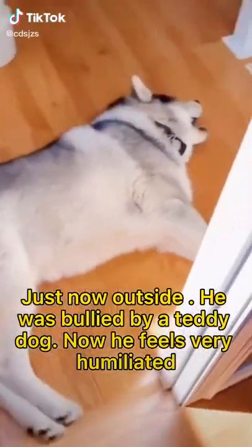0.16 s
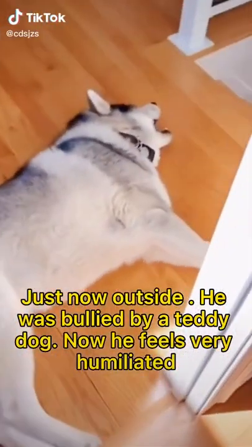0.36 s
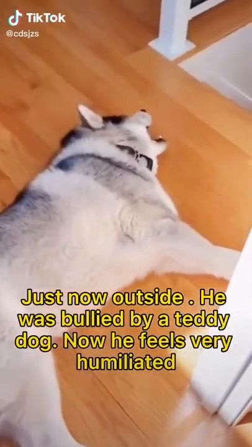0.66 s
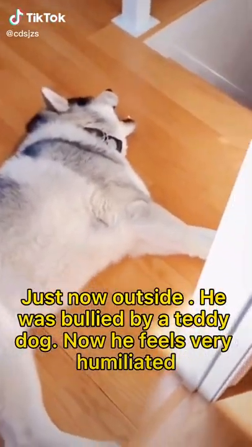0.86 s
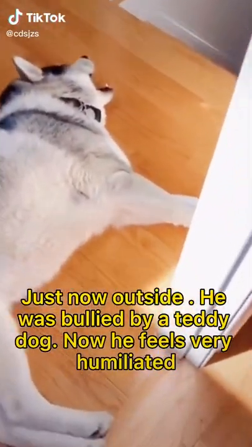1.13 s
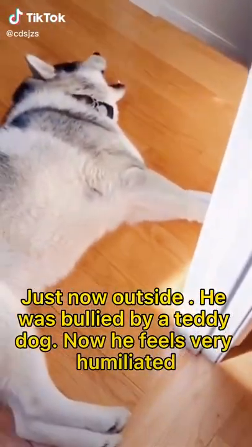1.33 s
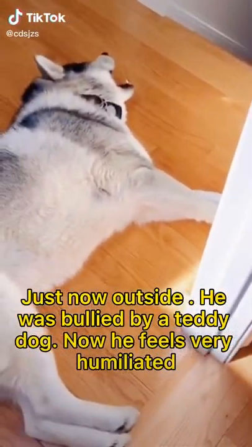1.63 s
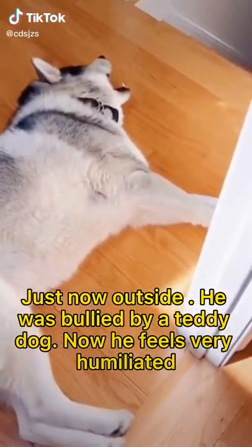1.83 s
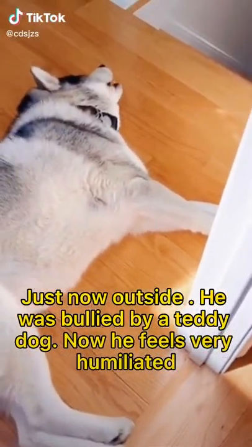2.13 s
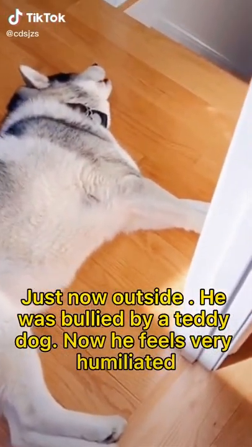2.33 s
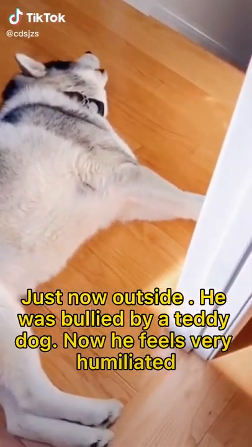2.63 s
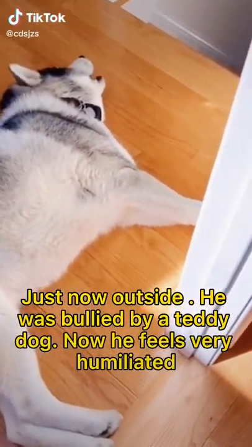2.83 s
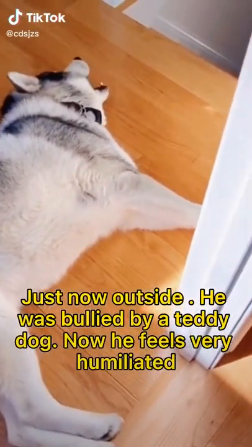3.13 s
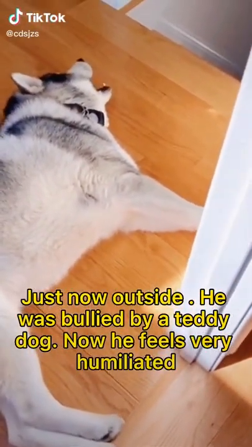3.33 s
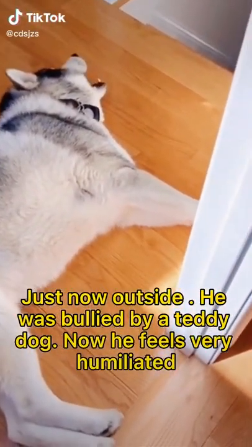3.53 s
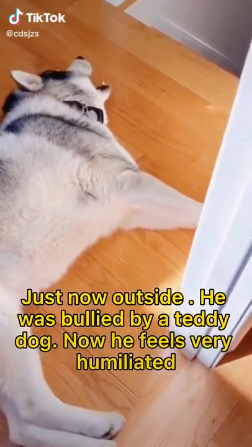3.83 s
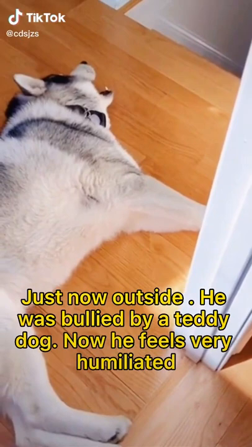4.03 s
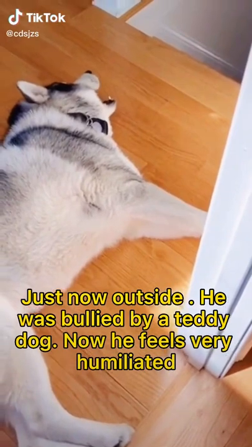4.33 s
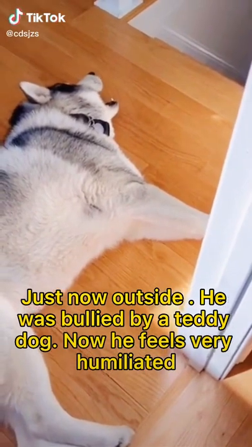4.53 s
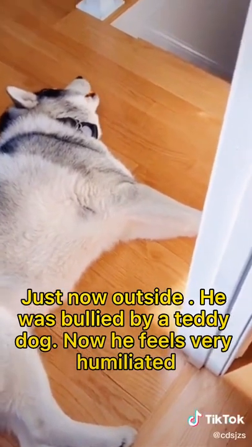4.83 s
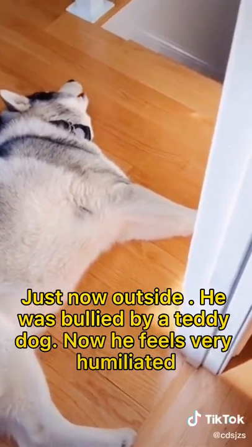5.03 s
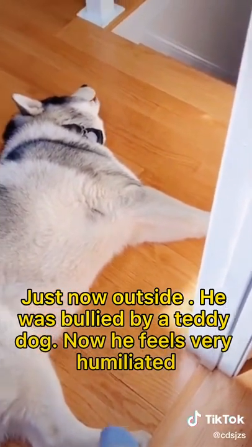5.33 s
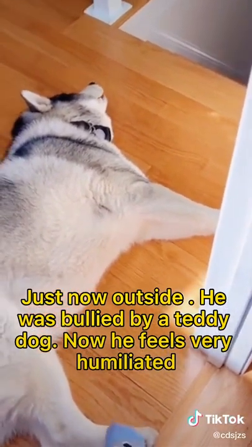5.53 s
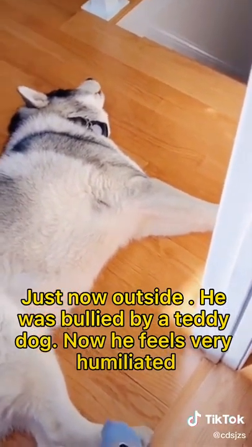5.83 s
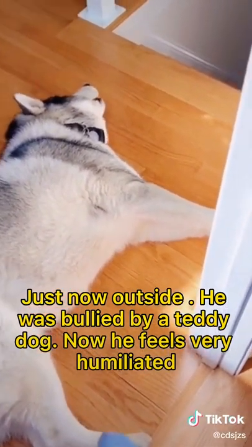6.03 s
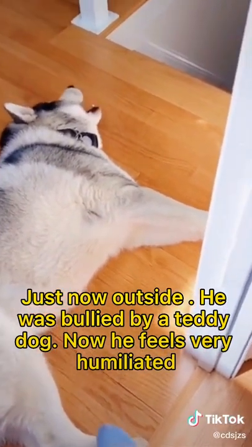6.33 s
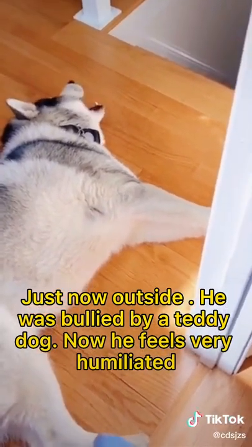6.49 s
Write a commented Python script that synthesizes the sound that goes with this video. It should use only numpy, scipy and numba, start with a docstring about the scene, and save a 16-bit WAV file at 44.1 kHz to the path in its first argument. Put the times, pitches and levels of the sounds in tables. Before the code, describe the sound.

Three loud dog howls in a hard, reflective room, captured close by a phone that squeezes the loud notes. The first is pure and held around one pitch; the second starts low, wobbles and goes raspy and screamy, held for over a second; the third, after nearly a second of quiet, begins as a soft groan and leaps upward with voice cracks. Faint low rustles and soft hiss lie beneath.

```python
"""In a bare, ringing room with a wooden floor, a husky howls three times, close to a phone.
The first howl is one clean note; the second wavers and breaks into a hoarse scream.
The third climbs from a low groan and cracks twice.
One pulsing larynx drives the resonances of throat and mouth, with a thin whistle and hiss on top.
Still air, soft rustles and faint hiss lie underneath; the phone's limiter holds loud notes down."""
import sys
import numpy as np
from scipy import signal
from scipy.fft import rfft, irfft, next_fast_len
from scipy.io import wavfile
from scipy.ndimage import uniform_filter1d, minimum_filter1d
from numba import njit

SR = 44100
rng = np.random.default_rng(int(sys.argv[2]) if len(sys.argv) > 2 else 0)


def store_pcm(level_fs):
    """Save levels as 16-bit WAV."""
    pcm = np.round(np.clip(level_fs, -1, 1) * 32767).astype(np.int16)
    wavfile.write(sys.argv[1], SR, np.atleast_2d(pcm).T)


N = 293706
TIME = np.arange(N) / SR

# tone colour of the still room: f/Hz, relative level/dB
AIR_SPECTRUM = [(15, -36), (25, -1), (59, -9), (159, -13), (183, -22.5), (219, -10.5), (285, -29),
                (777, -41.5), (1390, -48.5), (2490, -45.5), (3050, -53), (3960, -70.5), (6710, -120)]
AIR_DB = -60.5  # overall level of the still room, before the phone
# soft low rustles: t/s, half-length/s, level/dB, upper edge f/Hz
RUSTLES = [(0.425, 0.48, -50, 47.8), (2.156, 0.065, -39.5, 248)]

# how long the room's tail takes to fall by 60 dB: f/Hz, decay time/s
ROOM_T60 = [(250, 0.33), (800, 0.72), (2300, 0.5), (4500, 0.29), (9000, 0.32), (14000, 0.089)]
# tone colour of the dense tail, weaker where standing waves carry the sound: f/Hz, gain/dB
DIFFUSE_SPECTRUM = [(200, -3), (420, -1.5), (560, 1), (730, -5), (900, 1.5), (1300, -8), (1700, 0),
                    (3000, -5.5), (9000, -2)]
# the room's strongest standing waves: f/Hz, relative gain/dB, decay time for 60 dB/s
ROOM_MODES = [(460, -5, 0.61), (527, -5, 0.77), (544, -4, 0.41), (599, 8, 1), (638, 1.5, 0.12),
              (695, -4, 0.15), (716.6, -8, 0.49), (720, 1, 0.04), (789, -2, 0.29), (740, -8.5, 0.7),
              (767, 1, 0.39), (845, 6, 0.17), (840, -11, 0.2), (1024, 3.5, 0.25), (1104.2, 9, 0.19),
              (1084, -2, .6), (1075, 1.5, .6), (1256, -2, 0.85), (1250, -0.5, .6), (1238, 6, 1)]
# the fundamental surges or sags as direct and reflected sound add or cancel:
# t/s, half-length/s, gain/dB
SURGES = [(0.067, 0.0055, -10.5), (0.171, 0.0046, -9), (0.427, 0.012, -8), (0.773, 0.026, -12),
          (0.949, 0.027, -12), (1.235, 0.029, -15.5), (2.636, 0.0073, -12.5), (2.657, 0.01, 4.5),
          (2.72, 0.0093, -9.5), (2.76, 0.0061, 10.5)]

# pitch of the larynx, one curve per howl: t/s, f/Hz
PITCH = [
    [(0, 675.6), (.07, 708.8), (.22, 725.1), (.47, 739.7), (.8, 743.8), (1.15, 746.5), (1.42, 725.5),
     (1.7, 729.6), (1.88, 712.4), (1.96, 564)],
    [(2.26, 360), (2.3, 507.5), (2.4, 590.4), (2.49, 520.6), (2.61, 501.4), (2.75, 573.3), (2.85, 681.3),
     (2.92, 612.6), (2.965, 628.7), (3.12, 806.7), (3.27, 748), (3.5, 731), (3.6, 651.8), (3.73, 593.8),
     (3.77, 794.8), (4.0, 791), (4.28, 753.3), (4.47, 781.7), (4.64, 766.8)],
    [(5.56, 382.2), (5.68, 536.8), (5.82, 581.7), (6.05, 768), (6.065, 580.3), (6.23, 740), (6.37, 792.5),
     (6.395, 664), (6.52, 697.8), (6.66, 707)],
]
# effort of the dog, one curve per howl: t/s, relative level/dB, mouth opening/0-1
EFFORT = [
    [(0, 0.5, 0.59), (.3, -2.5, .35), (.5, -4, 0.52), (.85, -9, .72), (1.3, -2.5, 0.35), (1.7, 5.5, 0.34),
     (1.94, -17, 0.76)],
    [(2.27, -13.5, .3), (2.36, -7, 0.46), (2.47, -14, 0), (2.75, -12.5, 0.3), (2.86, -10.5, 0.53),
     (3.12, -10.5, 0.51), (3.3, -16.5, 0.9), (3.41, -0.5, 0.44), (3.55, -16.5, 0.73), (4.2, -16.5, .75),
     (4.62, -15.5, 0.55)],
    [(5.58, -29, 0.08), (5.635, -17, .05), (5.71, -30.5, .05), (5.8, -28, .05), (5.95, -15, 0.5),
     (6.12, -8, 0.52), (6.32, -7, .6), (6.42, -13, 0.74), (6.66, -9, 0.7)],
]
# strained stretches, where the vocal folds flap unevenly:
# start t/s, length/s, roughness added to the calm voice/0-1, share of strong-weak pulsing/0-1
STRAINS = [(1.914, 0.045, .35, 0), (2.249, 0.044, .45, 0.4), (2.331, 0.092, .65, 0.4), (2.462, 0.55, 0, 0),
           (2.966, .13, 0.7, 0.8), (3.136, 0.11, 0.3, .5), (3.369, 0.17, 0.2, .2), (3.539, 0.15, .13, .08),
           (3.718, .55, .66, 1), (4.298, .36, 0.5, 1), (5.544, .12, .65, 0.6), (5.795, 0.31, .12, 0.7),
           (6.051, .04, 0.8, .4), (6.102, 0.18, .06, 0), (6.35, 0.028, .7, 0.6), (6.495, 0.12, .11, .28)]
STRAIN_ATTACK_S, STRAIN_RELEASE_S, CALM_ROUGHNESS = .025, .05, 0.032

# what the throat passes before the mouth shapes it: f/Hz, gain/dB
THROAT = [(150, -29), (290, -12), (370, 8), (450, 7), (700, 4), (1250, 0.5), (1740, -4.5), (1950, 3.5),
          (2300, -3), (2520, 3.5), (2720, -8.5), (2950, -10.5), (3250, -13.5), (4500, -46.5)]
# overtones that leak past the mouth's resonances: f/Hz, relative level/dB
OVERTONES = [(2500, -28), (3100, -2), (3700, 7), (4500, -12.5), (5300, -2), (6100, -2.5), (6700, -25),
             (9000, -28.5), (15000, -37.5)]
# the whistle and its side tones: f/Hz, relative level/dB
WHISTLE_SPECTRUM = [(5500, -49), (6500, -23.5), (7000, -4), (7750, 3), (8450, -8.5), (9200, 4.5),
                    (9950, -10), (10700, -0.5), (11400, -2), (12600, -16), (14000, -28.5)]
# rushing air in the open throat: f/Hz, relative level/dB
HISS_SPECTRUM = [(2500, -18), (3300, -1.5), (3900, 1), (4600, -8.5), (5800, 6.5), (6800, 2), (7800, -3),
                 (8600, -5), (9300, -8.5), (10100, -11.5), (11300, -4), (12300, -13), (13500, -27),
                 (16000, -33.5)]

# the jaw tunes the first resonance to the note; strain pulls it down
JAW_REST_HZ, JAW_PER_PITCH, JAW_LAG_S, JAW_STRAIN_HZ = 127, 0.91, 0.15, 88
JAW_WIDTH_HZ = 504
# second, third and fourth resonance of the mouth: f/Hz, width/Hz
UPPER_RESONANCES = [(1137, 603), (2130, 503), (2640, 323)]
# level with the mouth shut, against the effort, and gain as it opens fully
SECOND_SHUT_DB, SECOND_OPEN_DB = -28.5, 22
THIRD_SHUT_DB, THIRD_OPEN_DB = -23, 21
FOURTH_SHUT_DB, FOURTH_OPEN_DB = -25, 14
SECOND_ROUGH_DB = 6.5  # a fully rough voice fills the second resonance
FOURTH_CLEAN_DB, CLEAN_ROUGHNESS = -18.5, 0.098  # a clean voice fades the fourth
# nasal twangs, where the second resonance gains on the first:
# t/s, half-length/s, lift of the second resonance/dB
TWANGS = [(1.94, .03, 7.5), (2.96, .055, 14.5), (3.66, 0.077, 11.5), (6.47, 0.15, 8)]
TWANG_TRADE = 0.92  # dB that the first resonance loses for each dB of lift

# the chest groans an octave below the larynx as the third howl starts, growing with effort
GROAN_START_S, GROAN_END_S, GROAN_ATTACK_S, GROAN_RELEASE_S = 5.555, 6.035, 0.013, 0.053
GROAN_DB, GROAN_GROWTH = -8.5, 0.41  # base level; dB gained for each dB of effort
GROAN_SWELL_S, GROAN_SOFT_DB = 5.88, -22.5  # it stays soft until it swells

TOP_HZ = 15700  # the phone cuts everything above


def undb(db):
    """Turn decibels into gain."""
    return 10 ** (np.asarray(db) / 20)


def unit(x):
    """Scale to an average strength (rms) of 1."""
    return x / np.sqrt(np.mean(x ** 2))


def steady(x):
    """Even out the strength over time, holding the running rms at 1."""
    size = SR // 40
    power = uniform_filter1d(uniform_filter1d(x * x, size), size)
    return x / np.sqrt(np.abs(power) + 1e-12)


def curves(howl_curves):
    """Join each column of the howls' points by straight lines in time."""
    t, *columns = np.vstack(howl_curves).T
    return [np.interp(TIME, t, column) for column in columns]


def swells(rows):
    """Add up bell-shaped swells given as (t/s, half-length/s, height)."""
    return sum(height * np.exp(-.5 * ((TIME - t) / half_s) ** 2) for t, half_s, height in rows)


def along_hz(points, hz):
    """Read values between (f/Hz, value) points, with equal steps per octave."""
    f, value = np.transpose(points)
    return np.interp(np.log(hz + 1e-9), np.log(f), value)


def colour(x, points):
    """Filter a sound so each frequency gets its gain from (f/Hz, gain/dB) points."""
    size = next_fast_len(N + SR // 10)
    gain = undb(along_hz(points, np.fft.rfftfreq(size, 1 / SR)))
    return irfft(rfft(x, size) * gain, size)[:N]


def wander(hz):
    """Random motion of rms 1, mostly slower than hz."""
    lowpass = signal.butter(2, hz, fs=SR, output="sos")
    return unit(signal.sosfilt(lowpass, rng.standard_normal(N)))


@njit
def moving_bandpass(x, hz, width):
    """Pass a band around a centre that may move, using a state-variable filter."""
    y, band, low = np.empty(len(x)), 0., 0.
    for i in range(len(x)):
        g, k = np.tan(np.pi * hz[i] / SR), width / hz[i]
        v = (band + g * (x[i] - low)) / (1 + g * (g + k))
        band = 2 * v - band
        low = low + 2 * g * v
        y[i] = k * v
    return y


@njit
def follow(x, attack, release):
    """Track loudness with an envelope that rises fast and falls slowly."""
    out, e = np.empty(len(x)), 0.
    for i in range(len(x)):
        e += (abs(x[i]) - e) * (attack if abs(x[i]) > e else release)
        out[i] = e
    return out


def still_air():
    """The quiet room: random noise, strongest at the bottom."""
    return undb(AIR_DB) * unit(colour(rng.standard_normal(N), AIR_SPECTRUM))


def microphone_hiss(gain_db=-85):
    """Faint noise of the microphone itself, with more mids than treble."""
    return undb(gain_db) * colour(rng.standard_normal(N), [(3000, 7.5), (12000, -8.5)])


def rustles():
    """Dull swells of noise, one as the phone moves in and one in the pause after the first howl."""
    out = np.zeros(N)
    for t, half_s, db, edge_hz in RUSTLES:
        spectrum = [(edge_hz / 8, -12), (edge_hz / 3, 0), (edge_hz, -2),
                    (edge_hz * 2, -18), (edge_hz * 25, -36), (edge_hz * 60, -55)]
        noise = unit(colour(rng.standard_normal(N), spectrum))
        out += noise * swells([(t, half_s, undb(db))])
    return out


def dense_tail(build_s=0.0033):
    """Countless echoes as fading noise, each frequency band dying at its own rate."""
    f, frames, grains = signal.stft(rng.standard_normal(SR), SR, nperseg=256)
    t60 = along_hz(ROOM_T60, f)[:, None]
    decay = np.exp(-np.log(1000) * frames / t60) / np.sqrt(t60)
    tail = signal.istft(grains * decay, SR)[1][:SR]
    tail = tail * (1 - np.exp(-TIME[:SR] / build_s))  # echoes need a moment to build up
    return tail / np.sqrt(np.sum(tail ** 2))


def standing_waves():
    """Waves trapped between the walls ring on as fading pure tones."""
    t = TIME[:SR]
    ring = np.zeros(SR)
    for hz, db, t60 in ROOM_MODES:
        rate = np.log(1000) / t60
        level = undb(db) * 2 * rate / SR  # long rings start softer
        ring += level * np.exp(-rate * t) * np.cos(2 * np.pi * hz * t)
    return ring


def room(x, wet_db=-0.5, direct_db=-5, modes_db=-5):
    """Bare walls and floor add standing waves and a dense tail to the direct sound."""
    diffuse = colour(signal.fftconvolve(x, dense_tail())[:N], DIFFUSE_SPECTRUM)
    ringing = signal.fftconvolve(x, standing_waves())[:N]
    return undb(direct_db) * x + undb(wet_db) * diffuse + undb(modes_db) * ringing


def surge(x):
    """The lowest partial dips or swells briefly while the overtones carry on."""
    fundamental = colour(x, [(850, 1.0), (1100, -42)])
    return x - fundamental * (1 - undb(swells(SURGES)))


def strain():
    """Roughness and strong-weak pulsing: each strain sets in fast, holds, and relaxes."""
    rough, alternate = np.zeros(N), np.zeros(N)
    for start_s, length_s, roughness, share in STRAINS:
        attack = np.clip((TIME - start_s) / STRAIN_ATTACK_S, 0, 1)
        release = np.exp(-np.maximum(TIME - start_s - length_s, 0) / STRAIN_RELEASE_S)
        shape = attack * release
        rough = np.maximum(rough, roughness * shape)
        alternate = np.maximum(alternate, share * shape)
    return CALM_ROUGHNESS + rough, alternate


def larynx(hz, rough, alternate, jitter=.06, lurch=.05, shimmer=1.0, tremor=0.0012, leak=0.047,
           flutter_db=4, sway=.02):
    """Vocal-fold pulses and phase; strain upsets pitch and size and may weaken every second pulse."""
    bend = (tremor + lurch * rough ** 1.3) * wander(28)
    bend += sway * rough * wander(9)
    bend += jitter * rough ** 1.3 * wander(170)
    phase = 2 * np.pi * np.cumsum(hz * (1 + bend)) / SR
    pulses = sum(np.cos(k * phase) for k in np.arange(1, 13))  # twelve partials
    size = 1 + alternate * np.cos(phase / 2 + 1.2 * rough * wander(40))
    size += shimmer * rough ** 1.4 * wander(790)
    size *= undb(flutter_db * rough * wander(90))  # the strained folds flap unevenly
    breath = leak * rough ** 0.62 * rng.standard_normal(N)
    return unit(pulses * size) + breath, phase


def groan(phase, level_db, swell_s=0.012):
    """The chest sounds at half the pitch: soft at first, then swelling until the voice cracks."""
    attack = np.clip((TIME - GROAN_START_S) / GROAN_ATTACK_S, 0, 1)
    release = np.clip((GROAN_END_S - TIME) / GROAN_RELEASE_S + 1, 0, 1)
    soft = .5 - .5 * np.tanh((TIME - GROAN_SWELL_S) / swell_s)
    groan_db = GROAN_DB + GROAN_GROWTH * level_db + GROAN_SOFT_DB * soft
    return undb(groan_db) * (attack * release) ** 2 * unit(np.sin(phase / 2))


def treble(source, rough, overtone_db=-28, whistle_hz=7015, carrier=0.26,
           whistle_rough_db=-38.55, whistle_clear_db=5.7, hiss_rough_db=-29, hiss_clear_db=-20):
    """Faint overtones, hiss, and a thin whistle that each pulse of the larynx chops into side tones."""
    clear = np.exp(-rough / 0.16)  # near 1 in a clean voice, near 0 in a hoarse one
    moving_hz = whistle_hz * (1 + 0.07 * rough * wander(13))  # a rough voice unsettles its pitch
    whistle = (source + carrier) * np.sin(2 * np.pi * np.cumsum(moving_hz) / SR)
    whistle_db = whistle_rough_db + whistle_clear_db * clear
    hiss_db = hiss_rough_db + hiss_clear_db * clear
    out = undb(overtone_db) * steady(colour(source, OVERTONES))
    out += undb(whistle_db) * steady(colour(whistle, WHISTLE_SPECTRUM))
    return out + undb(hiss_db) * unit(colour(rng.standard_normal(N), HISS_SPECTRUM))


def resonance(x, hz, width_hz):
    """An air space in the mouth favours one band: the band-pass applied twice for steep sides."""
    hz = hz * np.ones(N)
    once = moving_bandpass(x, hz, float(width_hz))
    return moving_bandpass(once, hz, float(width_hz))


def voicing(onset_s=.014, stop_s=0.048):
    """Open the voice for each howl and close it afterwards."""
    gate = np.zeros(N)
    for howl in EFFORT:
        start_s, end_s = howl[0][0], howl[-1][0]
        fade_in = np.clip((TIME - start_s) / onset_s + 0.87, 0, 1)  # starts slightly early
        gate += fade_in * np.clip((end_s - TIME) / stop_s + 1, 0, 1)
    return gate ** 2


def howls(treble_growth=1.142, treble_db=3.5, patchy_db=3.0):
    """Four resonances shape the pulses; an opening mouth lifts the upper ones, and the treble more."""
    [hz] = curves(PITCH)
    level_db, opening = curves(EFFORT)
    rough, alternate = strain()
    twang_db = swells(TWANGS)

    first_db = level_db - TWANG_TRADE * twang_db
    second_db = level_db + SECOND_SHUT_DB + SECOND_OPEN_DB * opening
    second_db += SECOND_ROUGH_DB * rough + twang_db
    third_db = level_db + THIRD_SHUT_DB + THIRD_OPEN_DB * opening
    fourth_db = level_db + FOURTH_SHUT_DB + FOURTH_OPEN_DB * opening
    fourth_db += FOURTH_CLEAN_DB * np.exp(-rough / CLEAN_ROUGHNESS)

    smooth_pitch = uniform_filter1d(hz, int(JAW_LAG_S * SR))
    jaw_hz = JAW_REST_HZ + JAW_PER_PITCH * smooth_pitch - JAW_STRAIN_HZ * rough
    resonances = [(jaw_hz, JAW_WIDTH_HZ)] + UPPER_RESONANCES
    levels = [first_db, second_db, third_db, fourth_db]

    source, phase = larynx(hz, rough, alternate)
    throat = colour(source, THROAT)
    voice = undb(treble_db + treble_growth * third_db) * treble(source, rough)
    for (centre_hz, width_hz), db in zip(resonances, levels):
        flicker_db = patchy_db * rough * wander(18)  # when hoarse, each resonance flares on its own
        voice += undb(db + flicker_db) * steady(resonance(throat, centre_hz, width_hz))
    return voice * voicing() + groan(phase, level_db)


def scene():
    """The dog in its room, over still air, rustles and the microphone's faint hiss."""
    background = still_air() + microphone_hiss() + rustles()
    return (background + surge(room(howls())))[None]


def record(dry, drive_db=3, attack_s=.0002, release_s=0.083, ceiling=.89, window_s=.003):
    """The phone's limiter ducks loud notes, looking slightly ahead; peaks are rounded, the top is cut."""
    x = dry[0] * undb(drive_db)
    envelope = follow(x, 1 / (attack_s * SR), 1 / (release_s * SR))
    gain = np.minimum(1, ceiling / (envelope + 1e-9))
    size = int(window_s * SR)
    x = x * uniform_filter1d(minimum_filter1d(gain, size), size)
    x = x / (1 + (x / .98) ** 24) ** (1 / 24)  # rounds only the last peaks
    top_cut = signal.ellip(8, .2, 70, TOP_HZ, fs=SR, output="sos")
    return signal.sosfilt(top_cut, x)[None]


dry = scene()
out = record(dry)
store_pcm(out)
```